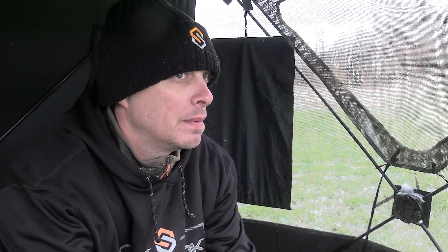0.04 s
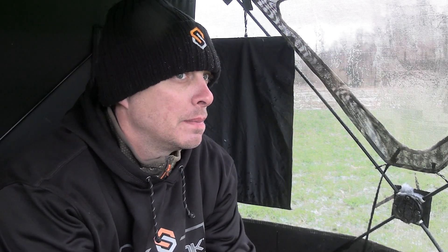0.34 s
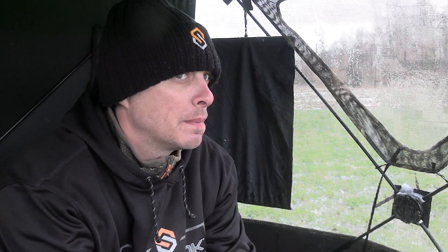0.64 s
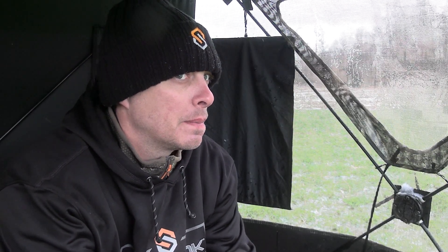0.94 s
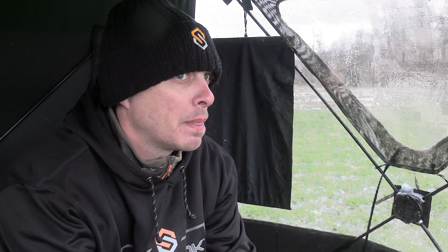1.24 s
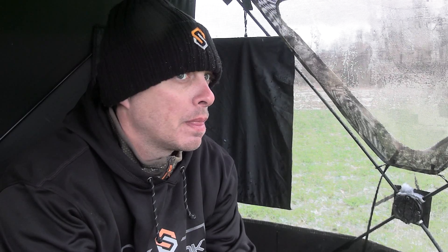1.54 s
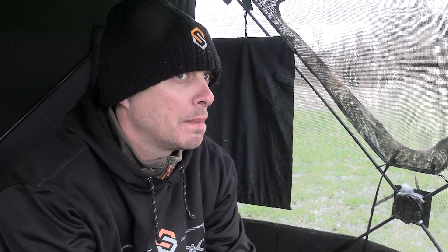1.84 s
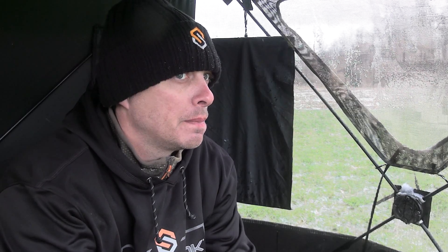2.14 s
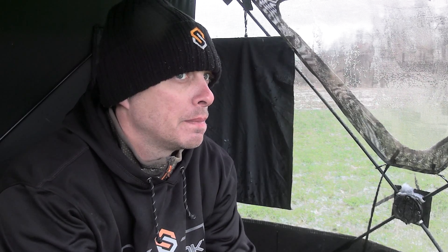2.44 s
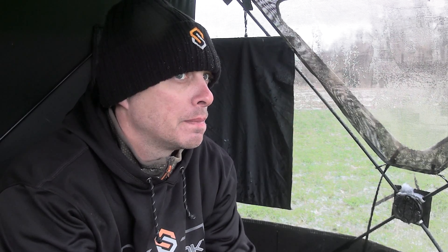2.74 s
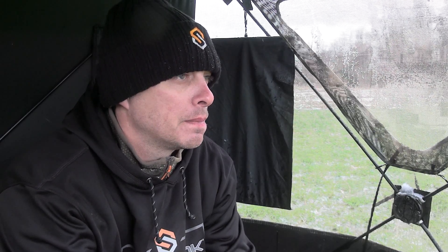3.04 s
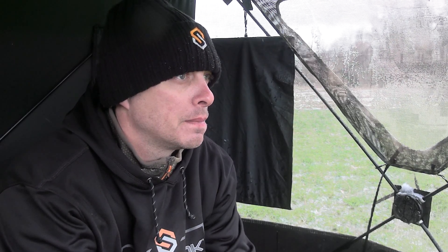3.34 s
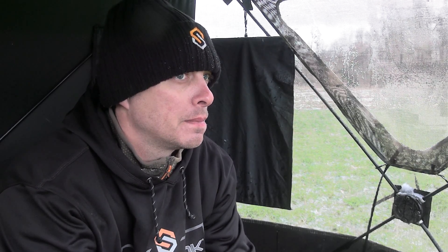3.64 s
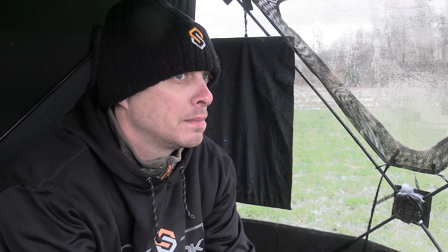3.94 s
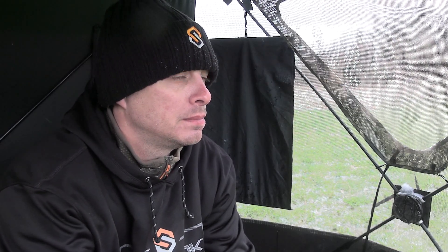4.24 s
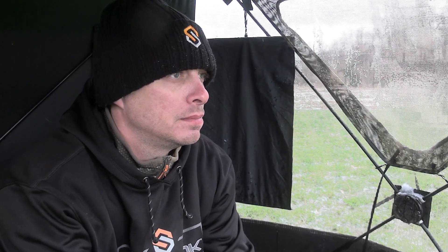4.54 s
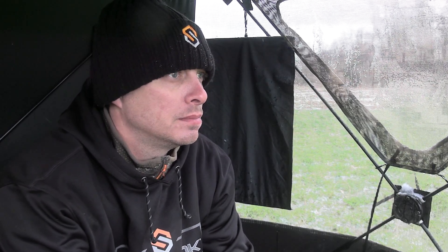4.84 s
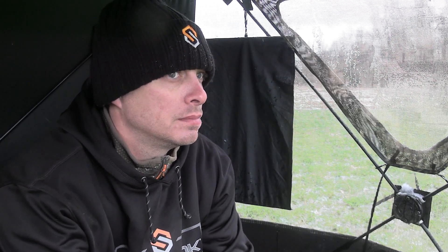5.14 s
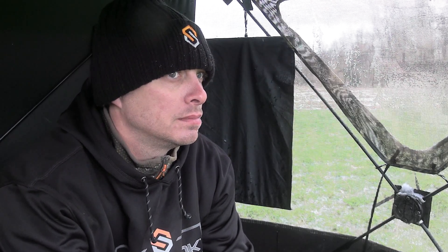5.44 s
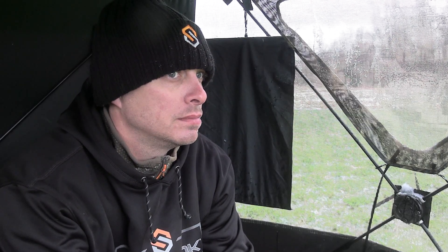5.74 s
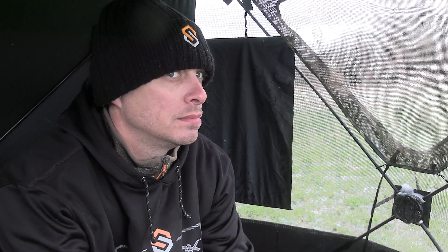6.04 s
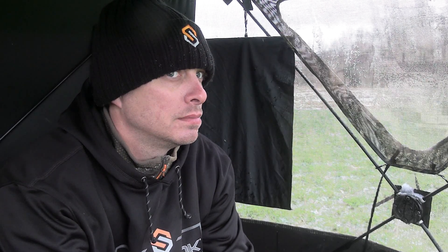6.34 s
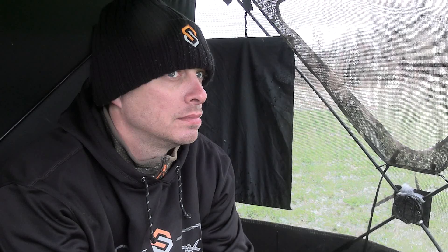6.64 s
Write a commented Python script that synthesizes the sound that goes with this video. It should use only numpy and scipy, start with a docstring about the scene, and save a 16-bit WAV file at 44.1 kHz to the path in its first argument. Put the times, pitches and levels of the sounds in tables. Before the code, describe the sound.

Soft outdoor air hiss and low wind rumble run throughout, heard from inside a fabric hunting blind. Two faint taps come just before 0.5 seconds. At about 0.6 seconds a friction turkey call begins close by, scraping twelve hen yelps at roughly three a second. The first strokes are light and timid. They grow louder through 2 seconds and turn firm and raspy from 2.5 seconds. Each starts with a brief high squeal and breaks into a lower note, with a faint hiss as the striker slides back. The last yelp ends around 4.2 seconds. The rest is quiet, with small dry taps on the walls and gear near 4.6, 5.5, 6, 6.4 and 6.7 seconds. The wind swells slightly around 5.7 seconds, and one very faint, thin peep like a distant bird sounds at about 6.5 seconds.

```python
"""A turkey friction call scrapes twelve hen yelps, soft at first, then louder and raspier.
The striker sticks and slips: each stroke starts as a high squeal, then breaks into a low note that
rings the call's body. It slides lightly back between strokes. The hunter sits in a fabric blind with
faint taps on walls and gear, over air hiss and wind rumble. A thin, far peep comes near the end."""
import sys
import numpy as np
from scipy import signal
from scipy.fft import rfft, irfft
from scipy.io import wavfile
from scipy.ndimage import uniform_filter1d

SR = 44100
rng = np.random.default_rng(int(sys.argv[2]) if len(sys.argv) > 2 else 0)


def dump_mix(stems):
    """Bounce the given channels to the path in sys.argv[1] as a 16-bit WAV at rate SR."""
    frames = np.atleast_2d(stems).T  # one column per channel
    limited = np.clip(frames, -1, 1)  # hard clip at full scale
    pcm = np.round(limited * 32767).astype(np.int16)
    wavfile.write(sys.argv[1], SR, pcm)


N = 299439
TIME = np.arange(N) / SR
FREQS = np.maximum(np.fft.rfftfreq(N, 1 / SR), 1)


def undb(db):
    """Decibels to gain."""
    return 10 ** (np.asarray(db) / 20)


def unit(x):
    """Scale to rms 1."""
    return x / np.sqrt(np.mean(x ** 2))


def shape(x, response):
    """Filter by a frequency response."""
    return irfft(rfft(x) * response, N)


def resonance(hz, width_hz):
    """One damped mode, gain 1 at its centre."""
    return 1 / (1 + 1j * (FREQS ** 2 - hz ** 2) / (FREQS * width_hz))


def highpass(x, hz, order):
    """Butterworth high-pass."""
    return signal.sosfilt(signal.butter(order, hz, "high", fs=SR, output="sos"), x)


def wander(rate_hz):
    """Smooth random drift, spread near 1."""
    knots_s = np.arange(0, TIME[-1] + 1, 1 / rate_hz)
    return 1.2 * np.interp(TIME, knots_s, rng.standard_normal(len(knots_s)))


# air hiss spectrum: (frequency [Hz], relative density [dB])
AIR_SPECTRUM = [(12, -26), (20, -0.5), (71, -10.5), (109, -10.5), (431, -21), (1790, -34), (2360, -36.5),
                (12900, -44.5), (14000, -49.5)]
# air hiss envelope: (time [s], level [dB])
AIR_ENVELOPE = [(1, -48), (4.299, -53.5), (5.6, -49.5)]
# gust envelope: (time [s], level [dB])
GUSTS = [(0, -35), (.4, -48), (.65, -33), (.98, -39.5), (1.2, -48), (4.3, -68), (4.55, -52), (5.3, -60),
         (5.75, -45.5), (6.79, -55)]


def wind():
    """Air hisses; gusts rumble on the blind."""
    hz, density_db = np.transpose(AIR_SPECTRUM)
    air = shape(rng.standard_normal(N), undb(np.interp(np.log(FREQS), np.log(hz), density_db)))
    air_db = np.interp(TIME, *np.transpose(AIR_ENVELOPE))
    rumble = shape(rng.standard_normal(N), resonance(hz=28.08, width_hz=13) / (1 + 1j * FREQS / 190))
    rumble_db = np.interp(TIME, *np.transpose(GUSTS)) + 2 * wander(35)
    return unit(air) * undb(air_db) + unit(rumble) * undb(rumble_db)


# taps: (time [s], level before final filters [dB], lower edge [Hz], upper edge [Hz])
TAPS = [(0.438, -56.5, 890, 5000), (0.489, -52, 890, 4900), (1.237, -53, 1200, 8950),
        (3.093, -51, 900, 4060), (3.725, -44.5, 751, 2493), (3.963, -53.5, 900, 4500),
        (4.588, -49, 559.5, 2613), (4.67, -49, 1290, 4300), (5.495, -50.5, 790, 2200),
        (5.969, -50, 750, 5500), (6.44, -50, 550, 3000), (6.743, -47, 2200, 5200)]


def taps(t60_s=.064):
    """Light taps on blind and gear: a sharp tick and a short, dry rattle each."""
    out = np.zeros(N)
    age_s = np.arange(SR // 10) / SR
    for start_s, db, low_hz, high_hz in TAPS:
        burst = rng.standard_normal(len(age_s)) * undb(-60 * age_s / t60_s)
        burst[0] += 6  # tick
        band = signal.butter(2, [low_hz, high_hz], "band", fs=SR, output="sos")
        tap = signal.sosfilt(band, burst) + .07 * burst
        attack_rms = np.std(tap[:SR // 100])
        first = int(start_s * SR)
        out[first:first + len(tap)] += (undb(db) * tap / attack_rms)[:N - first]
    return shape(highpass(out, hz=520, order=4), 1 / (1 + 1j * FREQS / 7000))


# modes of the call's body: (frequency [Hz], width [Hz], relative gain [dB])
BODY_MODES = [(714.5, 80, -15.5), (883, 51, -5), (1059, 63, -5), (1330.6, 63, 2), (1447, 91, 0.5),
              (1666, 124, -1), (1867, 49, 3.5), (1981, 35, -10), (2107, 84, -8.5), (2434, 74, -11.5),
              (2552, 73, -14), (2841, 120, -14), (3312, 110, -18), (3684, 380, -24), (4470, 100, -17.5),
              (4624, 120, -19.5), (4905, 120, -12), (5704, 130, -21), (6116, 92, -16), (7170, 1200, -33),
              (8450, 1400, -37)]


def body_response():
    """Neighbouring modes move in opposite directions; the top treble is damped."""
    modes = sum((-1) ** k * undb(db) * resonance(hz, width_hz)
                for k, (hz, width_hz, db) in enumerate(BODY_MODES))
    return modes / (1 + (FREQS / 11500) ** 12)


def timid():
    """1 during the first, lightly pressed strokes, then 0."""
    return np.interp(TIME, [1.3, 1.6], [1, 0])


def slips(hz, jitter, scatter, alternate):
    """One pulse per slip; jitter varies timing, scatter size, alternate weakens every second one."""
    skate = 1 + 1.2 * timid()  # a light striker skates unevenly
    phase = np.cumsum(hz * (1 + .006 * skate * wander(200))) / SR
    cycle = np.arange(1, int(phase[-1]) - 2)
    due = np.interp(cycle, phase, np.arange(N)).astype(int)
    jitter = (jitter * np.sqrt(skate))[due]
    scatter = (scatter * skate)[due]
    alternate = np.broadcast_to(alternate, N)[due]
    time_noise, size_noise = rng.standard_normal((len(cycle), 2)).T
    position = np.interp(cycle + jitter * time_noise, phase, np.arange(N))
    size = 1 + scatter * size_noise + alternate * (-1) ** cycle
    sample, fraction = position.astype(int), position % 1
    pulses = np.bincount(sample, size * (1 - fraction), N + 1)
    pulses += np.bincount(sample + 1, size * fraction, N + 1)
    return pulses[:N]


def radiate(pulses, grit, body, envelope, treble_gain):
    """Slips ring the body, each with a spray of surface grit."""
    sliding = unit(uniform_filter1d(np.abs(pulses), size=24))
    spray = grit * sliding * highpass(rng.standard_normal(N), hz=3500, order=1)
    force = unit(pulses - pulses.mean()) + spray
    ring = shape(force, body / (1 + (640 / FREQS) ** 14))
    dull = shape(ring, 1 / (1 + (FREQS / 3000) ** 6))
    middle = shape(ring, np.abs(resonance(hz=2200, width_hz=400)))
    sound = dull + (ring - dull) * treble_gain + .67 * timid() * middle
    # the hand sets the level, whichever mode the slips meet
    power = uniform_filter1d(uniform_filter1d(sound ** 2, size=300), size=300)
    return envelope * sound / np.sqrt(np.maximum(power, 1e-12))


def held_columns(rows, lead_s=.05):
    """Columns as per-sample controls; each row takes over lead_s before its start."""
    rows = np.array(rows)
    current = np.searchsorted(rows[:, 0] - lead_s, TIME) - 1
    return rows[np.maximum(current, 0)].T


# striker strokes, levels before the bass cut:
# (start [s], squeal length [s], squeal pitch [Hz], squeal level [dB], squeal sag [dB],
#  low note length [s], low pitch [Hz], low level [dB], lift-off level [dB],
#  pressure [0-1], pressure peak after the break [s])
STROKES = [ (0.621, 0.011, 854, -57, 0, .074, 772.5, -45, -55, .05, 0.036),
           (0.924, 0.048, 830, -43.5, 1.5, 0.09, 707, -26.5, -40, 0.1, .04),
           (1.246, 0.02, 897, -30, 1, 0.1, 709, -19.5, -27.5, .42, .088),
           (1.557, 0.016, 910, -20, 1.5, 0.12, 662.2, -16, -29, .45, .07),
           (1.876, 0.021, 922, -17.5, -2, 0.11, 675.5, -12.5, -25.5, .52, .06),
           (2.192, 0.021, 916.5, -16.5, -9, 0.12, 666, -11.5, -25.5, .52, 0.057),
           (2.512, .058, 955.7, -15.5, 8.5, 0.071, 660.6, -11.5, -28, .92, .008),
           (2.828, 0.07, 932, -11.5, 11.5, 0.066, 658.5, -15, -34, 1, .017),
           (3.15, .035, 947, -11.5, 15.5, .075, 660, -10.5, -24.5, 0.93, .012),
           (3.453, 0.041, 942, -10, 17.5, 0.077, 657, -12, -30, 1, .022),
           (3.759, 0.049, 933.7, -10, -0.5, .082, 657, -12, -37, 0.9, 0.014),
           (4.061, 0.019, 929, -12, 2.5, 0.098, 652.5, -13, -44, 1, 0.029)]


def squeal(body):
    """The tip chatters fast: it starts sharp and swells; held longer, it sags, creeps up and flutters."""
    settle_s, swell_s, sag_s, grip_s = .004, .021, .01, .008
    attack_s, release_s, creep_hz_per_s = .0013, .005, 690
    start_s, length_s, pitch_hz, db, sag_db = held_columns(STROKES)[:5]
    age_s = TIME - start_s
    unsteady = np.interp(age_s, [.026, .04], [0, 1])
    loose = np.clip(sag_db / 9, 0, 1)
    creep_hz = creep_hz_per_s * np.clip(age_s - .012, 0, .03) * loose
    hz = pitch_hz * (1 + .12 * np.exp(-np.maximum(age_s, 0) / settle_s)) + creep_hz
    swell_db = -27.5 * np.maximum(1 - age_s / swell_s, 0) ** 2
    sag = np.clip((age_s - swell_s) / sag_s, 0, 1) ** 2
    grip_db = 5 * loose * np.exp(-((age_s - length_s) / grip_s) ** 2)  # grips again at the break
    flutter_db = 4.5 * loose * sag * wander(160)
    level_db = db + swell_db - sag_db * sag + grip_db + flutter_db
    outside = np.maximum(-age_s, 0) / attack_s + np.maximum(age_s - length_s, 0) / release_s
    envelope = undb(level_db) * np.exp(-np.minimum(outside, 20))
    pulses = slips(hz, jitter=.01 + .022 * unsteady, scatter=.08 + .22 * unsteady, alternate=0)
    treble_gain = envelope ** .34 * (1.3 + .3 * unsteady)
    return radiate(pulses, undb(-16.5), body, envelope, treble_gain)


def hand_swell(from_peak_s, width_s=.025):
    """Hand pressure swells and eases once per stroke."""
    return np.exp(-(from_peak_s / width_s) ** 2)


def low_note(body):
    """Slower slips; under pressure they alternate strong and weak, then turn to an irregular rasp."""
    attack_s, crest_s, release_db_per_s = .0011, .05, 949.5
    curl_hz, curl_lead_s, curl_s = 201.3, .006, .008
    slide_hz, slide_s, rest_pressure = 114.8, .014, .29
    start_s, squeal_s, _, _, _, length_s, pitch_hz, db, lift_db, press, peak_s = held_columns(STROKES)
    age_s = TIME - start_s - squeal_s
    left_s = length_s - age_s
    # lowest and loudest crest_s before lift-off, then fades and curls upward
    dip = np.exp(-((left_s - crest_s) / (.032 + .025 * timid())) ** 2)
    curl = (1 + np.tanh((curl_lead_s - left_s) / curl_s)) / 2
    slide = timid() * np.exp(-np.maximum(age_s, 0) / slide_s)
    hz = pitch_hz * (1 + .06 * (1 - dip)) + curl_hz * curl + slide_hz * slide
    rise_db = (47 + 120.5 * timid()) * np.maximum(left_s - crest_s, 0)
    fade_db = (db - lift_db) * np.clip(1 - left_s / crest_s, 0, 1) ** 3.2
    release_db = release_db_per_s * np.maximum(-left_s, 0)
    envelope = undb(db - rise_db - fade_db - release_db) * np.exp(np.clip(age_s / attack_s, -20, 0))
    pressure = press * (rest_pressure + (1 - rest_pressure) * hand_swell(age_s - peak_s))
    doubling = np.interp(pressure, [.24, .45, 1], [0, .6, .45])
    rasp = pressure ** 2
    pulses = slips(hz, jitter=.009 + .068 * rasp * pressure, scatter=.06 + .55 * rasp, alternate=doubling)
    # lift-off after a firm stroke rounds the pulses: the fundamental takes over
    lift = (1 - timid()) * np.exp(-(left_s / .015) ** 2)
    pulses += .9 * lift * (uniform_filter1d(pulses, size=25) - pulses)
    grit = undb(-18 + 13 * pressure)
    treble_gain = envelope ** .62 * (1.59 + 1.6 * rasp)
    return radiate(pulses, grit, body, envelope, treble_gain)


def slide_back(body):
    """From the third stroke on, the striker glides back without catching: faint hiss in the body."""
    glide = np.zeros(N)
    for stroke, following in zip(STROKES[2:], STROKES[3:]):
        start_s, squeal_s, _, _, _, low_s, *_ = stroke
        from_s, to_s = start_s + squeal_s + low_s + .03, following[0] - .015
        progress = np.clip((TIME - from_s) / (to_s - from_s), 0, 1)
        glide += np.sqrt(np.maximum(np.sin(np.pi * progress), 0))
    hiss = shape(rng.standard_normal(N), body * FREQS ** 1.41)
    return unit(hiss) * glide * undb(-55.5)


def scrape():
    """Hard pressure drags the striker over the surface: dull noise below the low note."""
    start_s, squeal_s, *_, low_db, _, press, peak_s = held_columns(STROKES)
    drag = press ** 3 * hand_swell(TIME - start_s - squeal_s - peak_s)
    noise = shape(rng.standard_normal(N), resonance(hz=450, width_hz=220) ** 2)
    return unit(noise) * drag * undb(low_db - 44.5)


def peep(centre_s=6.52, width_s=.055):
    """One faint, thin whistle, like a far-off bird."""
    swell = np.exp(-((TIME - centre_s) / width_s) ** 4)
    hz = 2503 + 8 * wander(60)
    return undb(-67) * swell * np.sin(2 * np.pi * np.cumsum(hz) / SR)


def blind(x, t60_s, wet_db):
    """Fabric walls return a short, weak scatter."""
    age_s = np.arange(SR // 4) / SR
    echo = rng.standard_normal(len(age_s)) * undb(-60 * age_s / t60_s) * (age_s > .004)
    return x + undb(wet_db) * signal.fftconvolve(x, echo / np.linalg.norm(echo))[:N]


def scene():
    """Call and taps inside the blind, wind and peep outside; mono."""
    body = body_response()
    call = squeal(body) + low_note(body) + slide_back(body)
    call = highpass(call, hz=638, order=8)  # too small to radiate bass
    inside = blind(call + scrape() + taps(), t60_s=.061, wet_db=-8)
    return (inside + wind() + peep())[None]


def record(dry):
    """Steep low-pass at 14 kHz."""
    return signal.sosfilt(signal.ellip(8, .2, 70, 14000, fs=SR, output="sos"), dry)


dry = scene()
out = record(dry)
dump_mix(out)
```